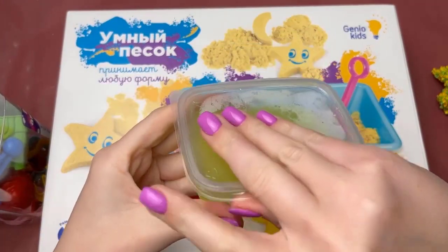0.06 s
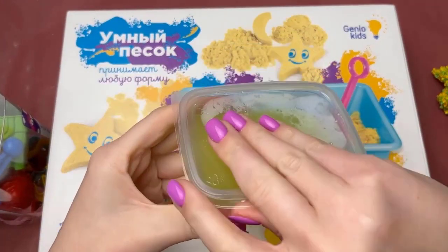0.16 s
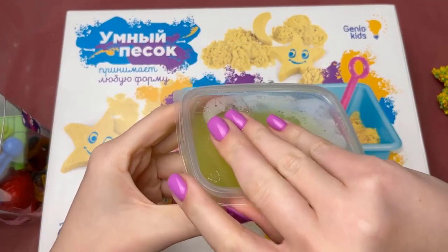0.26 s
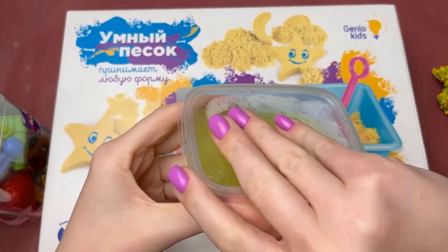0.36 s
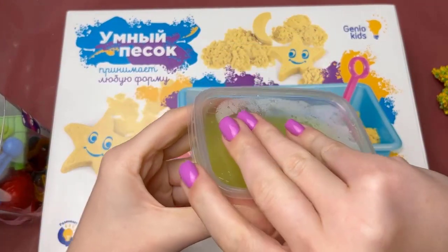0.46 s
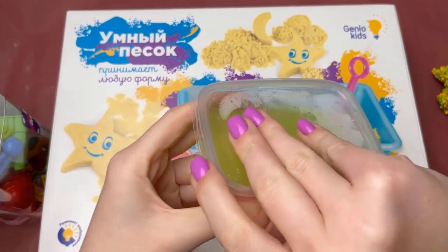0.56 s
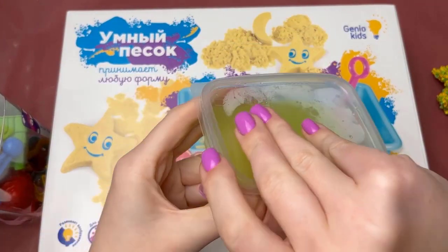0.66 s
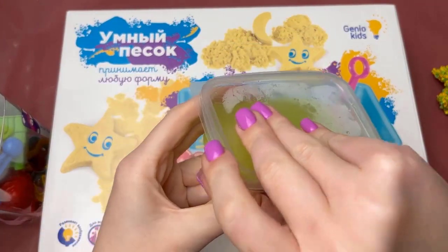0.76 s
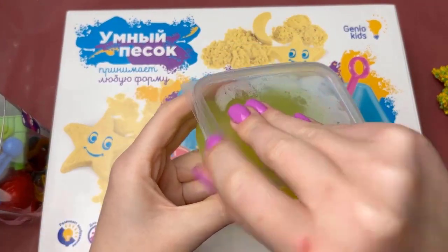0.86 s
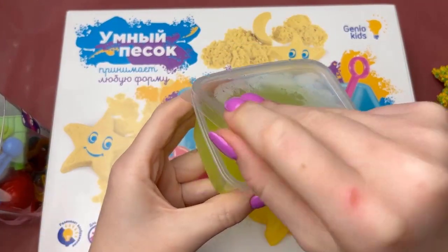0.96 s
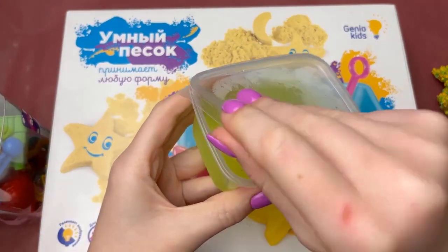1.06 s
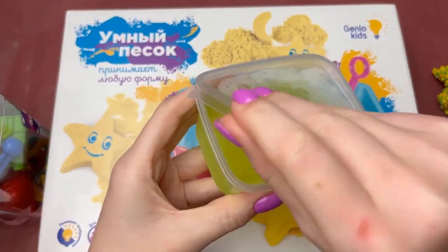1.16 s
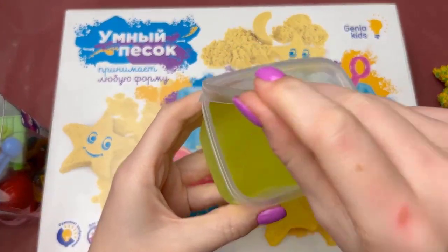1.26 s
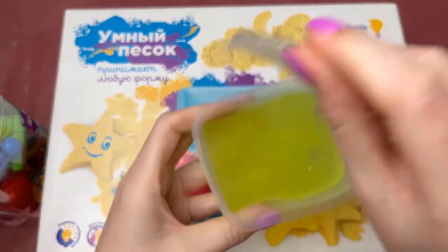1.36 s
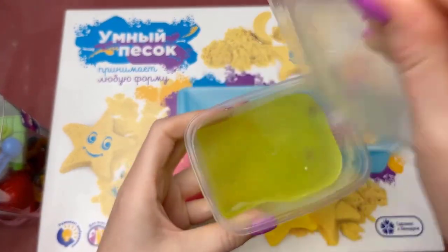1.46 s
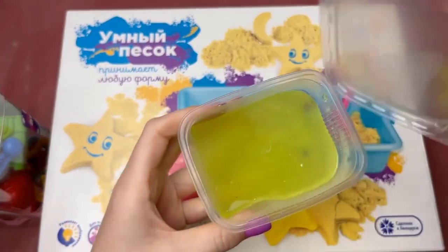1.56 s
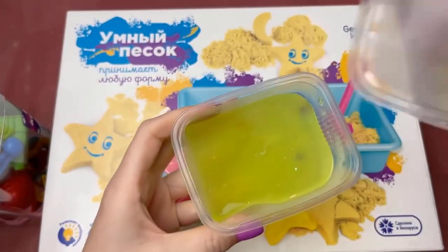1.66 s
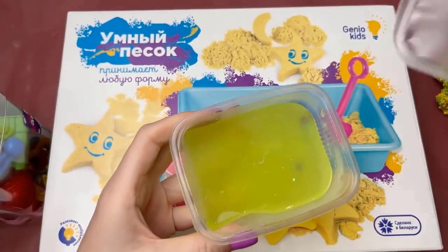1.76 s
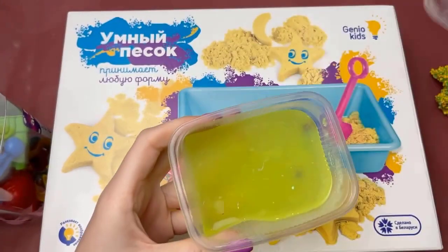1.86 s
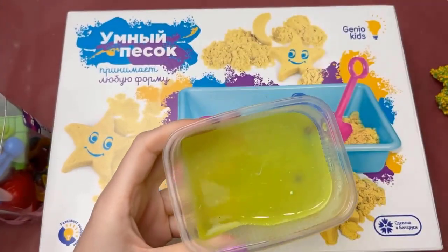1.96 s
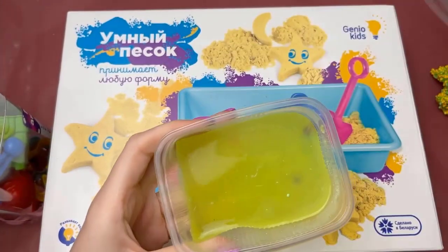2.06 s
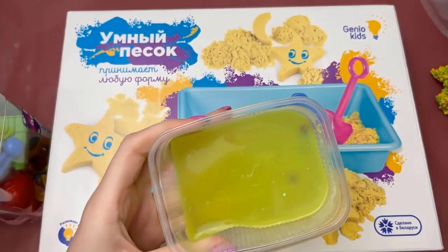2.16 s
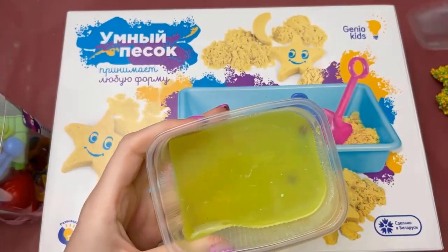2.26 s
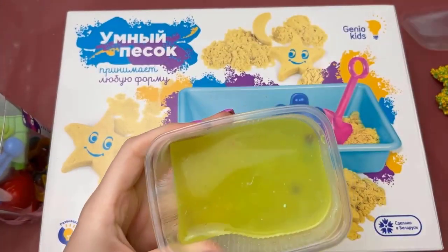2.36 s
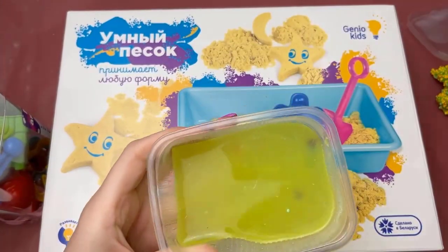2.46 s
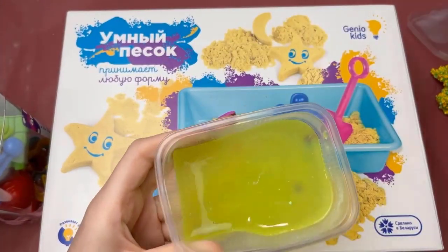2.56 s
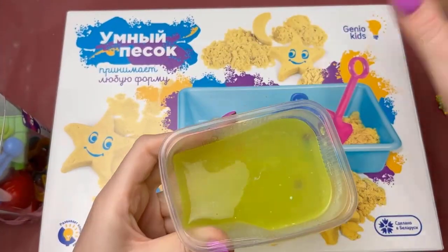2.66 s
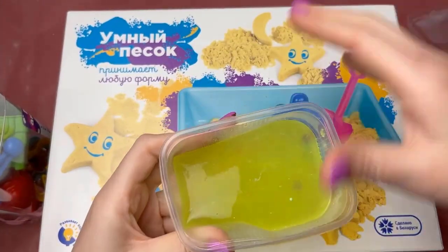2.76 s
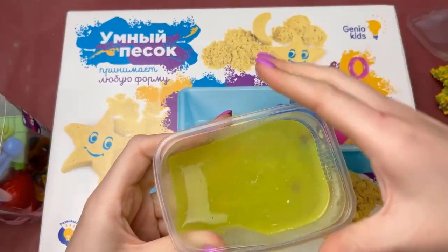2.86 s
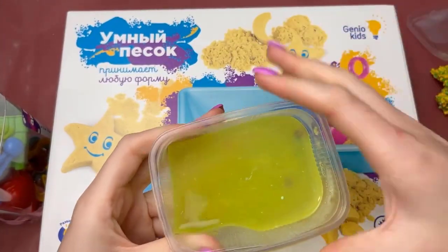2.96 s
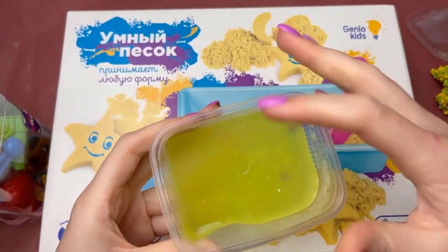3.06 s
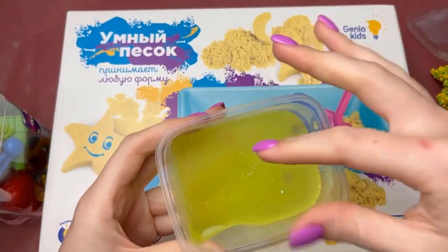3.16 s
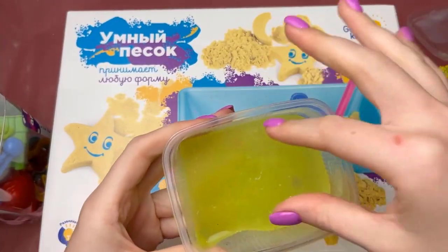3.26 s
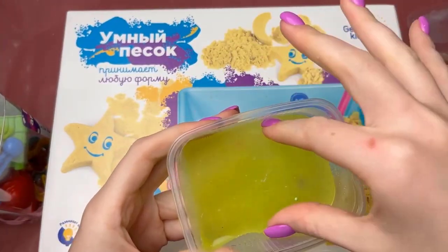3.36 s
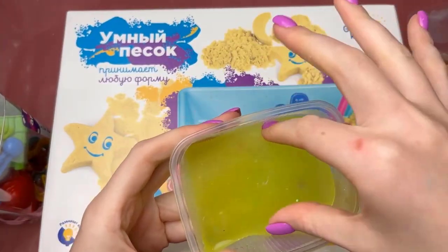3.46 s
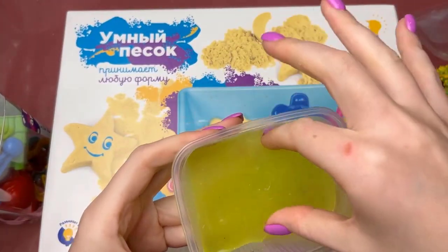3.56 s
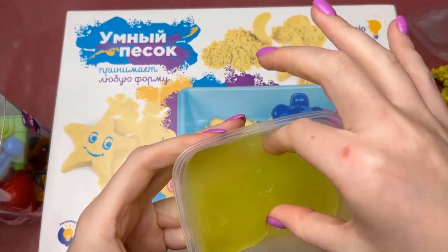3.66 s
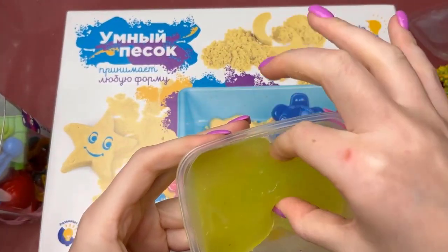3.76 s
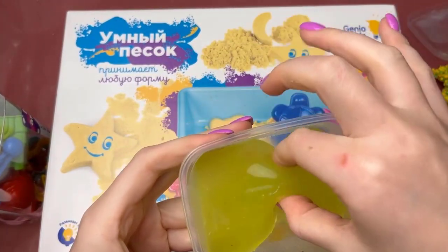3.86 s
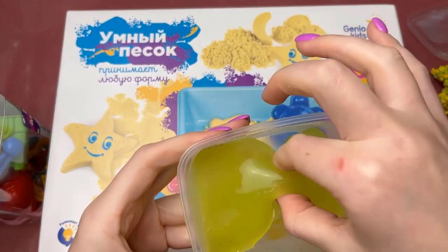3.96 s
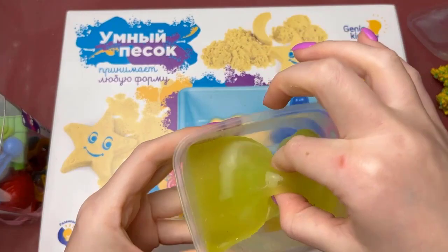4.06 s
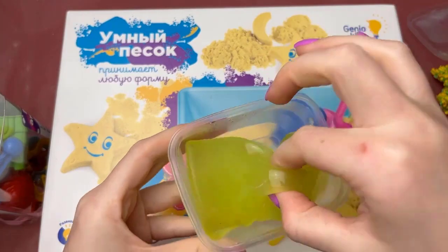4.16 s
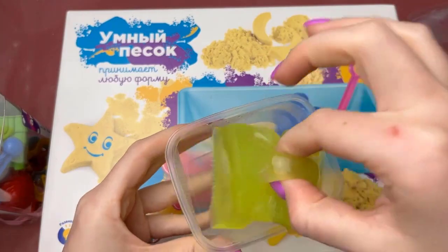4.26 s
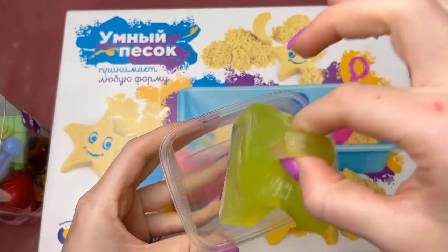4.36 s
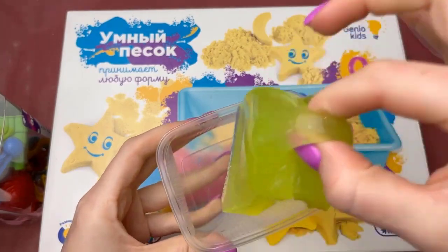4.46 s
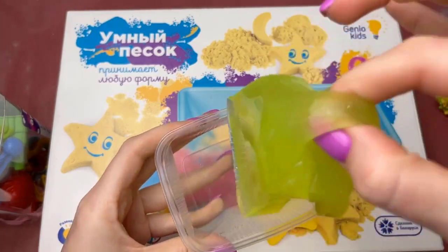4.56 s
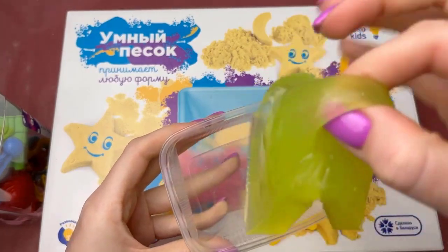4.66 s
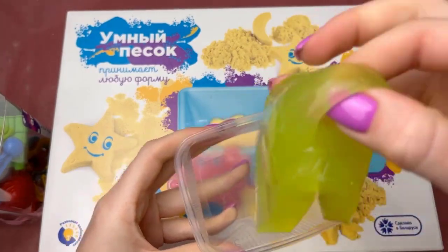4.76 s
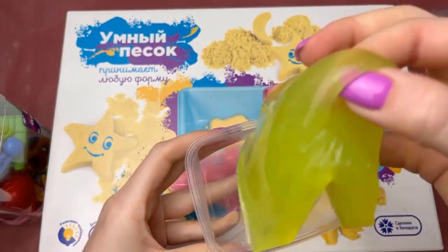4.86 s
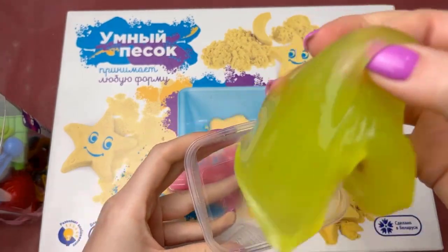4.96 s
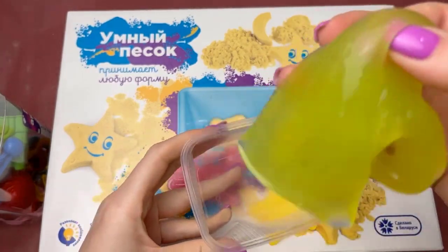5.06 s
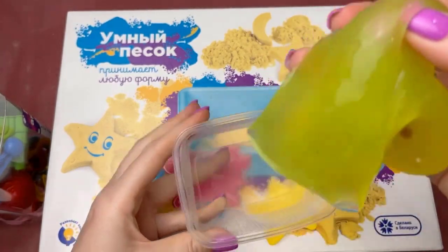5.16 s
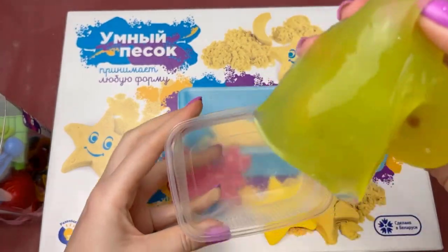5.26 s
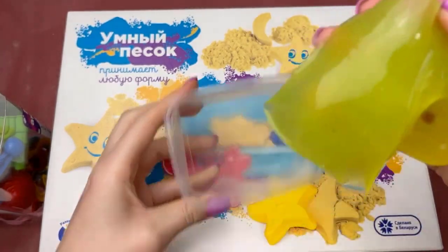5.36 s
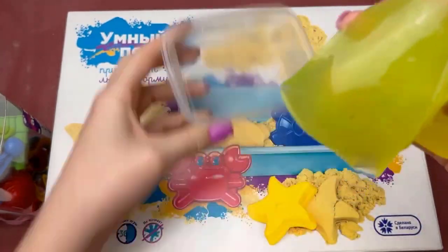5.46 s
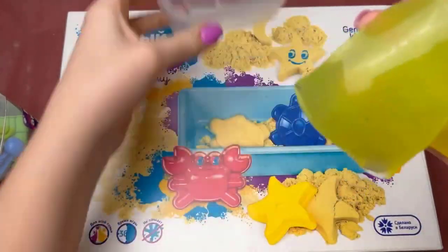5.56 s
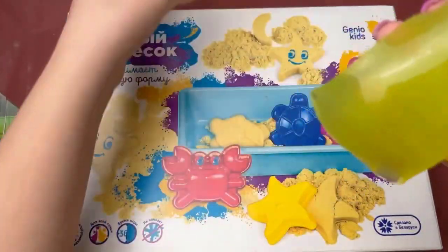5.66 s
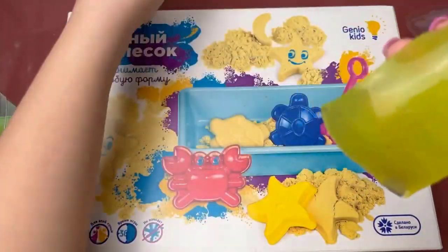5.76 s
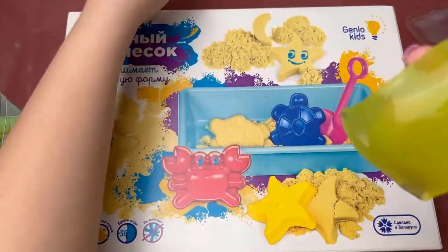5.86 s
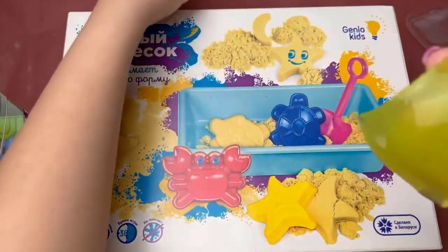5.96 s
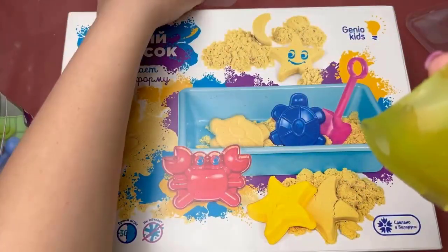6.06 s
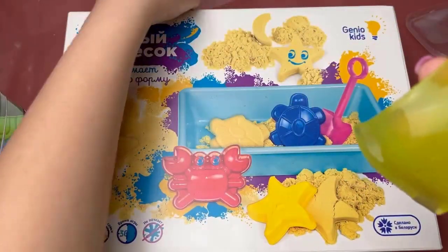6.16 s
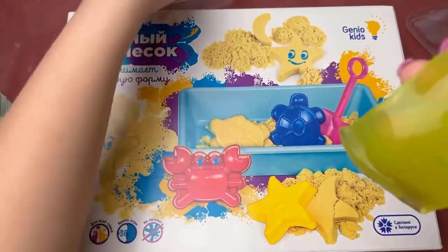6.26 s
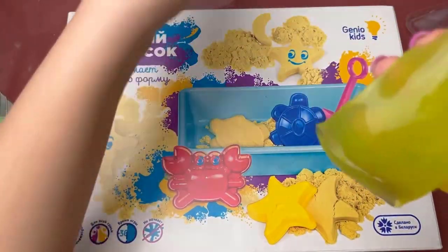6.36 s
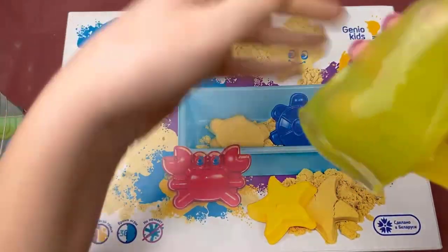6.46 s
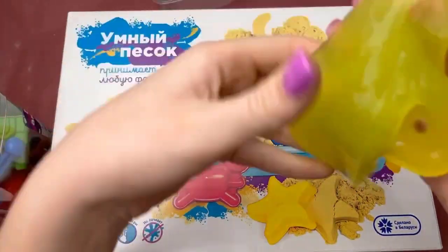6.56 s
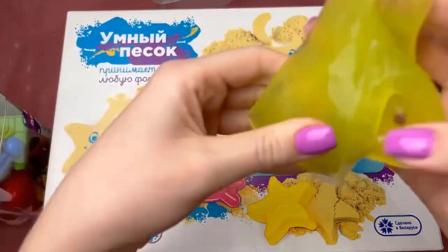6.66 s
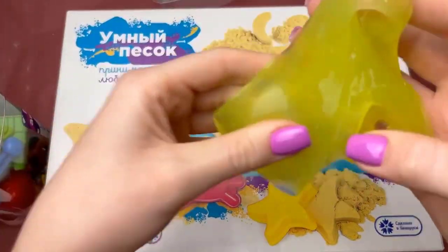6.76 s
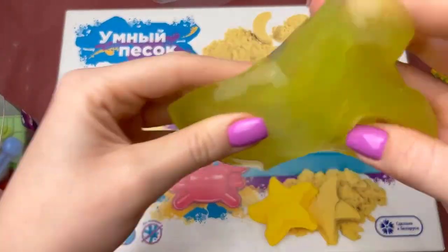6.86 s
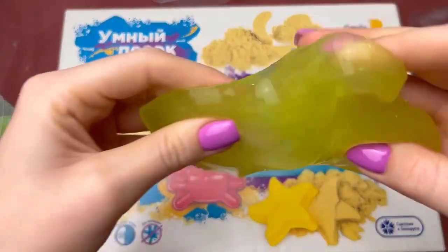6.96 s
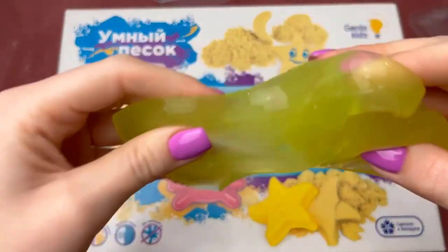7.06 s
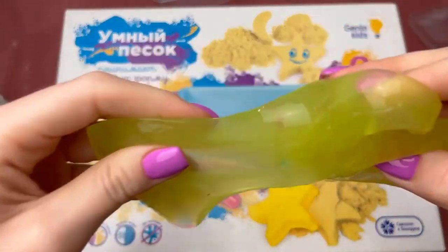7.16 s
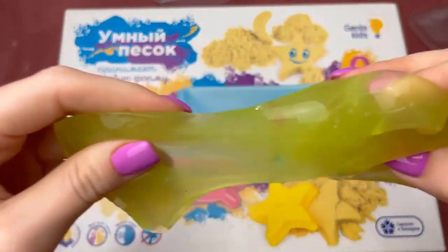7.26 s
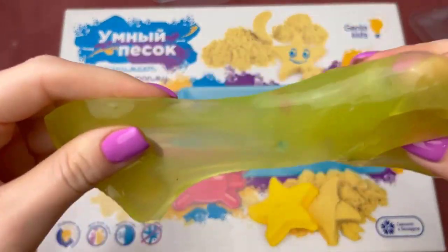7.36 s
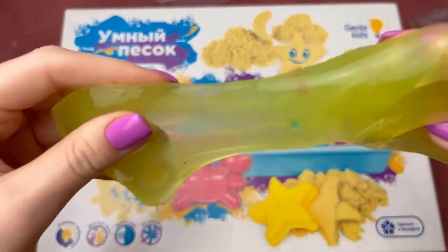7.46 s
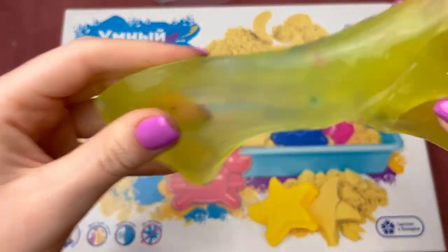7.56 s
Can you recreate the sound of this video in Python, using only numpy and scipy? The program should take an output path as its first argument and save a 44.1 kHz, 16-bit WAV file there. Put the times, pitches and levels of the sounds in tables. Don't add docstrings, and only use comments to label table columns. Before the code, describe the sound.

Close stereo microphone in a small, lightly echoing room with low household rumble. Fingers rub a thin plastic tub and its rim clicks, then snaps hard, building to a very loud, distorted burst as the lid tears free. The lid drops with a small clack. Quiet follows, with skin rubs and tiny ticks, then sticky slime peels with soft wet pops. Finally the empty tub taps and knocks hollowly on the table, rattling briefly.

```python
import sys
import numpy as np
from scipy import signal
from scipy.fft import rfft, irfft
from scipy.io import wavfile

SR = 44100
rng = np.random.default_rng(int(sys.argv[2]) if len(sys.argv) > 2 else 0)


def int16_out(signal):
    q = np.round(np.clip(np.atleast_2d(signal).T, -1, 1) * 32767)
    wavfile.write(sys.argv[1], SR, q.astype(np.int16))


def boost(x):
    u = np.asarray(x, float) / 20
    return 10 ** u


N = 335160

# frequency in hertz, level in dB.
RUMBLE = [(60, -31), (100, -16.5), (125, -15), (225, 0), (270, -10.5), (376, -9.5), (560, -14.5),
          (780, -16.5), (1700, -24.5), (2400, -32.5), (5000, -37.5), (7500, -46), (10000, -49.5),
          (13000, -57.5)]
# time in seconds, level in dB.
SWELL = [(0.0, -48.5), (0.8, -46.5), (1.7, -44), (3.4, -43), (4.25, -43), (7.6, -41.5)]
# frequency in hertz, width in hertz, level in dB.
HUMS = [(100, 15, -74), (206, 5.6, -60.5), (234, 26, -48.5), (366, 44, -53), (506, 21, -53),
        (551.5, 23, -53), (773, 2, -57.5), (3490, 6, -70)]
# start in seconds, hold in seconds, level in dB.
SHAKES = [
    (.99, 0.011, -36.5),
    (1.57, 0.0081, -45),
    (6.27, 0.0097, -35.5),
]
# time in seconds, frequency in hertz, level in dB.
WHINE = [
    (1.82, 580, -68),
    (1.86, 611, -48),
    (1.93, 659, -46),
    (1.98, 655, -55),
    (2.06, 631, -54),
    (2.11, 596, -59),
]
# start in seconds, hold in seconds, level in dB.
HANDLING = [
    (.17, .02, -46.5),
    (.44, 0.75, -51),
    (1.2, 0.041, -41.5),
    (1.5, 0.4, -51),
    (2.41, 0.017, -47),
    (2.96, 0.017, -48),
    (3.49, 0.014, -48),
    (4.2, 1.4, -52.5),
    (6.29, 0.022, -63),
]
# start in seconds, hold in seconds, level in dB.
SLIDES = [(.08, 0.031, -56), (.2, 0.38, -62), (.42, 0.11, -53.5), (.52, 0.092, -46), (1.79, .01, -54.5),
          (2.08, 0.019, -48.5), (2.28, .01, -57.5), (3.0, 0.013, -61.5), (3.42, 0.13, -56),
          (3.56, 0.0062, -47.5), (4.14, 0.14, -60), (5.86, 0.0093, -59.5), (6.53, 0.012, -60),
          (6.86, 0.034, -61.5), (7.32, 0.017, -60)]
# frequency in hertz, level in dB.
SLIDE_COLOUR = [(700, 6.5), (1500, 1.5), (3000, -14), (5000, 3), (8000, -0.5), (11500, -8), (15000, -29)]
# start in seconds, hold in seconds, level in dB.
CRACKLE = [(.095, 0.0027, -38.5), (.925, 0.013, -35), (.96, 0.077, -34.5), (.75, 0.1, -42),
           (1.41, 0.075, -24), (1.48, 0.16, -32), (3.865, 0.0082, -48), (4.1, 0.027, -54),
           (4.15, 0.067, -44.5), (4.275, 0.0055, -37), (4.3, 0.048, -46), (4.615, 0.018, -53),
           (5.218, 0.019, -40), (6.13, 0.089, -37.5), (6.27, 0.02, -29.5), (6.3, 0.017, -32.5),
           (6.36, 0.017, -39), (6.42, 0.12, -49.5)]
# frequency in hertz, level in dB.
CRACKLE_COLOUR = [(300, -7), (800, -1), (1400, 3), (2600, -8.5), (4500, -14.5), (8000, -20.5),
                  (12000, -54.5), (16000, -49.5)]
# start in seconds, hold in seconds, level in dB.
RASPS = [
    (.966, .004, -42),
    (1.405, 0.028, -43),
    (1.412, .003, -35.5),
    (1.426, .016, -38),
    (1.442, 0.035, -30),
    (1.48, .025, -47),
    (1.531, 0.0044, -33.5),
    (4.15, 0.23, -51),
]
# frequency in hertz, level in dB.
RASP_COLOUR = [(1500, -21.5), (3000, -1), (5000, 2.5), (8000, -7.5), (12000, -3.5), (14000, 1),
               (16000, 3.5)]
# time in seconds, peak in dB, wall pitch in hertz, crack in dB, flex in milliseconds.
LID_SNAPS = [(0.101, -26.5, 523, -18, 4.9), (0.289, -36, 550, -44, 7), (0.341, -18, 570, -32.5, 0.37),
             (0.391, -33, 590, -18, 2.2), (0.4336, -10.5, 1016, -75.5, 2.2), (0.4345, -25, 1770, -38, 2.2),
             (0.4364, -10, 553, -70, 3.3), (0.536, -34, 890, -12.5, 3.2), (0.585, -32.5, 985, -14, 2.7),
             (0.746, 7, 647, -22.5, 3.7), (0.7475, -3.5, 1057, -32, 2.7), (0.756, -22, 1050, -26, 7.6),
             (0.933, -16.5, 460, -29, 2.7), (0.938, -14.5, 1440, -23, 5), (0.9712, -3.5, 1790, -22, 2.8),
             (0.9755, -13.5, 1650, -22.5, 7), (0.9908, 1, 1127, -28, 2.34), (0.9938, -5, 610, -41.5, 2.3),
             (1.0025, 1.5, 1313, -28.5, 3.1), (1.182, -17, 1270, -34, 2.2), (1.39, 18.5, 1138, -27.5, 1.38),
             (1.402, -0.5, 854, -17.5, 4.2), (1.412, -11.5, 1210, -25, 1.1), (1.421, 6.5, 1340, -18, 4),
             (1.4245, 1, 1400, -25, 2.1), (1.456, 10, 1350, -23.5, 2.9), (1.4595, 9, 1320, -20, 3.4),
             (1.463, -1.5, 1380, -20, 3), (1.468, -6, 1320, -18.5, 3), (1.472, -10.5, 1400, -15, 2.8),
             (1.527, 2, 1136, -13.5, 3), (1.5335, -12.5, 569, -4, 7.3)]
# frequency in hertz, level in dB.
CRACK_COLOUR = [(1500, 3.5), (3000, 2), (5000, -2), (8000, -3.5), (11500, -11), (16000, -25.5)]
# frequency in hertz, level in dB, t60 in seconds.
TUB = [(526.3, -14.5, 0.05), (743.4, -0.5, 0.039), (994, -11.5, 0.016), (1162, 0.5, 0.018),
       (1400, -9.5, 0.16), (1800, -19.5, 0.052), (2400, -17.5, 0.038), (2796, -14.5, 0.091)]
# time in seconds, peak in dB, frequency in hertz, t60 in seconds.
THUDS = [(.102, -27, 250, 0.061), (0.746, -7, 267, 0.034), (0.994, -10.5, 330, 0.047),
         (1.238, -30.5, 60, 0.17), (1.395, -15, 124, 0.067), (1.535, -6.5, 133, 0.057),
         (1.931, -32, 100, 0.11), (2.392, -22.5, 234, 0.027), (3.393, -29.5, 391, 0.022),
         (4.102, -29.5, 232, 0.029), (4.297, -32, 232, 0.049), (5.209, -18, 394, 0.014),
         (5.241, -26, 232, 0.039), (6.142, -18.5, 356, 0.17), (6.246, -10.5, 367, 0.11),
         (6.325, -18.5, 87, 0.06), (7.33, -28.5, 43.1, 0.19)]
# time in seconds, peak in dB.
TICKS = [(0.2142, -46), (0.305, -51.5), (1.798, -44), (2.0744, -59), (2.172, -46.5), (2.26, -50.5),
         (2.314, -59), (3.697, -49.5), (4.089, -50.5), (4.164, -47), (5.191, -43), (6.844, -59),
         (7.292, -48), (7.319, -47)]
# time in seconds, peak in dB.
PEEL = [(4.18, -48), (4.188, -50), (4.211, -49), (4.2377, -50), (4.248, -57), (4.284, -45), (4.307, -49),
        (4.327, -47), (4.3343, -48)]
# time in seconds, level in dB.
PANEL_BLOWS = [
    (0.746, -22),
    (1.003, -30),
    (1.53, -27),
    (6.138, -23),
    (6.247, -26),
]
# frequency in hertz, level in dB, t60 in seconds.
PRESSED = [(610, -10, .3), (680, -12, 0.28), (960, -7, 0.32), (1056, -3, 0.088), (1400, -18, .2),
           (2260, -16, .25)]
# frequency in hertz, level in dB, t60 in seconds.
BENT = [(497, -5, 0.26), (1250, -4, 0.41), (1319, -5, 0.48), (1900, -13, 0.4), (2280, 0, 0.16),
        (3740, -9, 0.091)]
# frequency in hertz, level in dB, t60 in seconds.
FREED = [(1050, -3, 0.32), (1300, -6, 0.33), (1520, 0.5, .4), (2700, -1.5, 0.6), (3120, -2, 0.27),
         (4000, -16, .3)]
# frequency in hertz, level in dB, t60 in seconds.
LANDED = [(202, -10, 0.14), (339.5, -0.5, .12), (541, -5.5, 0.11), (690, -6, .08), (903, -5, .08),
          (1120, -17, 0.055)]
# time in seconds, peak in dB, pitch in hertz.
SLIPS = [(1.3965, -11.5, 1300), (1.4285, -18.5, 1000), (1.434, -14.5, 1400), (1.4427, -12, 1500),
         (1.448, -15, 1300), (1.4525, -9, 1440), (1.478, -11.5, 1400), (1.4865, -13, 1400),
         (1.4905, -15.5, 1333), (1.496, -12.5, 1437), (1.506, -17, 1400), (1.5205, -16.5, 1400),
         (1.528, -7.5, 2900), (1.5325, -11, 8600)]
# time in seconds, peak in dB, pitch in hertz, crack in dB,
# flex in milliseconds.
KNOCKS = [
    (1.905, -52, 646, -40.5, 4),
    (1.927, -32, 641.6, -4, 6.8),
    (6.1365, -10.5, 875, -11.5, 6.5),
    (6.139, -14, 330, -34, 2.7),
    (6.243, -21, 1500, 0, 2.2),
    (6.2455, -11.5, 390, -11, 2.4),
    (6.255, -9, 346, -20.5, 1.6),
    (6.29, -22, 292, -52.5, 11),
    (6.476, -36, 390, -8, 3.8),
    (6.1405, -16, 714, -40, 4.1),
]
# frequency in hertz, level in dB.
KNOCK_COLOUR = [(300, 1.5), (1500, -1), (3000, -0.5), (5000, 1), (8000, -2), (12000, -6)]
# time in seconds, peak in dB, pitch in hertz, crack in dB,
# flex in milliseconds.
LID_DROP = [
    (2.391, -19.5, 1235, -8.5, 1),
]
# time in seconds, peak in dB, pocket pitch in hertz, crack in dB,
# flex in milliseconds.
SLIME_POPS = [(2.679, -42, 1654, -30.5, 3.3), (3.393, -19.5, 1400, -40, 0.95),
              (3.461, -23.5, 1596, -16.5, 2), (3.658, -36, 1630, -11.5, 4.4),
              (3.8701, -34.5, 1455, -13, 2.8), (3.876, -23.5, 900, -17.5, 0.76),
              (4.1, -37.5, 1480, -10, 1.5), (4.137, -12, 1090, -27, 0.88), (4.198, -33, 1180, -13, 1.1),
              (4.227, -41, 1110, -16, 1.5), (4.3173, -35, 1460, -10, 1.2), (4.263, -34.5, 1300, -10, 4.6),
              (4.275, -31, 1580, -18, 3), (4.295, -47, 1850, -1, 1.6), (4.3417, -41.5, 1500, 2, 3.5),
              (4.346, -41, 1400, -3, 3.8), (4.612, -43.5, 1450, -15, 2.37),
              (5.2048, -15.5, 1698, -20, 1.17), (5.2065, -28.5, 783, -33, 2.1), (5.225, -36, 914, -7, 1.4),
              (5.242, -37, 867, -28, 0.94), (5.4683, -25.5, 1870, -9, 2.3), (5.472, -34.5, 1360, -20, 3.2),
              (4.621, -40, 1510, -14, 1.7), (3.98, -45.5, 3200, -31.5, 1.8),
              (4.1375, -21.5, 3430, -23, 1.4), (4.349, -38.5, 1400, -5, 2.5),
              (4.2595, -34, 1600, -3.5, 1.9), (4.357, -51, 1300, -6, 2.5)]
# time in seconds, peak in dB, pitch in hertz, crack in dB,
# flex in milliseconds.
SOFT_TAPS = [
    (6.0645, -22.5, 960, -61, 5.4),
    (6.069, -28, 855, -63.5, 3.5),
    (6.075, -29, 906, -60, 4),
]
# delay in milliseconds, level in dB.
DESK = [(1.0, -9), (1.7, -9)]
# frequency in hertz, t60 in seconds.
ROOM = [(150, 0.81), (400, 0.39), (1040, 0.42), (2760, 0.57), (7280, 0.5)]
# frequency in hertz, level in dB.
ROOM_COLOUR = [(100, 18), (300, 21), (700, 20), (1500, 19), (3000, 20), (6000, 13.5), (11000, 7.5),
               (16000, -13)]
LIKENESS = [(60, .95), (130, .94), (290, .8), (640, .3), (1400, .4), (2600, .25), (4000, .45), (5600, .8),
            (12000, .7)]
PORT_HALF_TURNS = [(0, 0), (1800, 0), (2600, .66), (3100, .62), (4000, .27), (4600, .45), (5250, .5),
                   (5950, 1), (6600, 1), (7200, 2), (8750, 2), (9700, 3), (10900, 3), (11300, 3.7)]


def rms_one(x):
    return x / np.sqrt(np.mean(x ** 2) + 1e-20)


def in_time(rows, outside=None):
    s, *columns = np.transpose(rows)
    return [np.interp(np.arange(N) / SR, s, c, outside, outside) for c in columns]


def at_hz(points, hz):
    table_hz, values = np.transpose(points)
    return np.interp(np.log(hz + 1), np.log(table_hz), values)


def coloured(x, spectrum):
    size = x.shape[-1]
    hz = np.arange(size // 2 + 1) * SR / size
    return irfft(rfft(x) * boost(at_hz(spectrum, hz)), size)


def diffuse(size):
    mid, side = rfft(rng.standard_normal((2, size)))
    alike = np.clip(at_hz(LIKENESS, np.arange(len(mid)) * SR / size), 0, 1)
    return irfft(np.sqrt(1 + alike) * mid + np.sqrt(1 - alike) * side * [[1], [-1]], size)


def ring(clicks, hz, t60):
    radius, angle = boost(-60 / (t60 * SR)), 2 * np.pi * hz / SR
    feedback = [1, -2 * radius * np.cos(angle), radius * radius]
    return signal.lfilter([0, np.sin(angle)], feedback, clicks + 1e-18)


def strokes(rows, rise, fall):
    t = np.arange(0, N, 32) / SR
    start, hold, db = np.transpose(rows)[:, :, None]
    before, after = np.maximum(start - t, 0), np.maximum(t - start - np.abs(hold), 0)
    level = db - rise * before - fall * after
    return np.interp(np.arange(N) / SR, t, np.sqrt(np.sum(boost(2 * level), axis=0)))


def waver(x):
    out, seconds = x.copy(), np.arange(N) / SR
    lulls = -np.interp(seconds * 2.5, np.arange(40), rng.standard_normal(40))
    for low in 1500 * 2 ** np.arange(0, 2.6, 1 / 3):
        flicker = np.interp(seconds * 9, np.arange(200), rng.standard_normal(200))
        gain = boost(2.5 * flicker + lulls)
        third = signal.butter(2, [low, low * np.cbrt(2)], "band", fs=SR, output="sos")
        out += (gain - 1) * signal.sosfiltfilt(third, x)
    return out


def household():
    rumble = waver(rms_one(coloured(diffuse(N), RUMBLE)))
    white = diffuse(N)
    for hz, width_hz, db in HUMS:
        rumble += boost(db + 42.5) * rms_one(ring(white, hz, 2.1 / width_hz))
    level = np.hypot(boost(in_time(SWELL)[0] - 2.0), strokes(SHAKES, rise=114, fall=68.5))
    whine_hz, whine_db = in_time(WHINE)[0], in_time(WHINE, -200)[1]
    whine = boost(whine_db) * np.sqrt(2) * np.sin(2 * np.pi * np.cumsum(whine_hz) / SR)
    return level * rumble + whine


def handling():
    bass = signal.butter(3, [40, 130], "band", fs=SR, output="sos")
    draught = rms_one(signal.sosfilt(bass, diffuse(N)))
    calm_db = -53.5
    return np.hypot(boost(calm_db), strokes(HANDLING, rise=57.5, fall=57.5)) * draught


def rubs():
    sizes = boost(3.5 * np.minimum(rng.exponential(1, N), 4)) * rng.choice([-1, 1], N)
    slips = sizes * (rng.random(N) < 2500 / SR)
    hiss = rms_one(coloured(rng.standard_normal(N), SLIDE_COLOUR))
    rasp = rms_one(coloured(slips, RASP_COLOUR))
    creak = rms_one(coloured(slips, CRACKLE_COLOUR))
    return (strokes(SLIDES, rise=326.5, fall=213) * hiss
            + strokes(CRACKLE, rise=898, fall=448) * creak
            + strokes(RASPS, rise=898, fall=898) * rasp)


def snaps(events, overtone, overtone_db, glide, clatter_db, clatter_ms, crack_ms, thump_hz, thump_db):
    size, lead = 2048, .008
    out, t = np.zeros((2, N + size)), np.arange(size) / SR - lead
    white = rng.standard_normal((len(events), 2, size))
    white[:, :, 358] = 2.0
    cracks, clatters = coloured(white[:, 0], CRACK_COLOUR), coloured(white[:, 1], CRACKLE_COLOUR)
    click = 1. * (np.arange(size) == 400)
    crack_step, clatter_step = [rms_one(coloured(click, c)) / 45 for c in (CRACK_COLOUR, CRACKLE_COLOUR)]
    after = np.maximum(t, 0)
    creep = boost(-24.0) * np.exp(np.minimum(t, 0) / 0.0066) * (t < 0)
    crack_shape = (t >= 0) * np.exp(-after / (crack_ms / 1000)) + creep
    clatter_shape = (t >= 0) * np.exp(-after / (clatter_ms / 1000)) + creep
    crack_step = crack_step * np.linalg.norm(crack_shape)
    clatter_step = clatter_step * np.linalg.norm(clatter_shape)
    for (s, db, hz, crack_db, flex_ms), crack, clatter in zip(events, cracks, clatters):
        swing = np.minimum(after / 0.0011, 1) * np.exp(-(after / (max(flex_ms, .5) / 1000)) ** 2.8)
        turns = hz * (0.9104 * after + glide * 0.0028 * (1 - np.exp(-after / 0.002)))
        flex = np.sin(2 * np.pi * turns) + boost(overtone_db) * np.sin(2 * np.pi * overtone * turns)
        push_level = boost(thump_db - 0.24 * db)
        push = push_level * np.sin(2 * np.pi * thump_hz * after) * np.exp(-after / 0.0084)
        high, mid = boost(crack_db + 7.5), boost(clatter_db + 0.16 * (crack_db + 19.5))
        near = high * rms_one(crack) * crack_shape + mid * rms_one(clatter) * clatter_shape
        far = high * crack_step + mid * clatter_step
        i = round((s - lead) * SR)
        out[:, i:i + size] += boost(db) * (swing * flex * boost([[0], [-3]]) + push + np.array([near, far]))
    return signal.sosfilt(signal.butter(2, 150, "high", fs=SR, output="sos"), out[:, :N])


def lid_rim():
    return snaps(LID_SNAPS, overtone=1.9, overtone_db=-10.0, glide=0.24, clatter_db=-16.5, clatter_ms=0.57,
                 crack_ms=3.3, thump_hz=200.0, thump_db=-27.0)


def tub(events):
    at, out = [round(e[0] * SR) for e in events], np.zeros(N)
    spread_db = 3 * rng.standard_normal((len(at), len(TUB)))
    for k, (hz, level_db, t60) in enumerate(TUB):
        clicks = np.zeros(N)
        clicks[at] = boost(np.array(events)[:, 1] + level_db - 20.0 + spread_db[:, k])
        out += ring(clicks, hz, np.clip(t60, .02, .15))
    return out


def thuds():
    out = np.zeros(N)
    for s, db, hz, t60 in THUDS:
        out += boost(db) * ring(np.arange(N) == round(s * SR), hz, t60)
    return signal.sosfilt(signal.butter(2, 500, fs=SR, output="sos"), out)


def ticks():
    hz, crack_db, flex_ms = 1600, -3.5, 0.47
    events = [(s, db, hz, crack_db, flex_ms) for s, db in TICKS + PEEL]
    return snaps(events, overtone=.7, overtone_db=-6, glide=.2, clatter_db=-26, clatter_ms=1.5,
                 crack_ms=2.5, thump_hz=250, thump_db=-50)


def panel():
    out = np.zeros(N)
    for (s, db), modes in zip(PANEL_BLOWS, (PRESSED, BENT, FREED, LANDED, LANDED)):
        click = np.arange(N) == round(s * SR)
        for hz, level_db, t60 in modes:
            for split in (.985, 1.015):
                out += boost(db + level_db) * ring(click, split * hz, np.clip(t60, .05, .4))
    return out


def seal_slips():
    crack_db, flex_ms = -31.5, 1.6
    events = [(s, db, hz, crack_db, flex_ms) for s, db, hz in SLIPS]
    return snaps(events, overtone=1.7, overtone_db=-13.5, glide=0.11, clatter_db=-16, clatter_ms=2.2,
                 crack_ms=1.5, thump_hz=200, thump_db=-40)


def dulled(x):
    return signal.sosfilt(signal.cheby2(8, 30, 13000, fs=SR, output="sos"), x)


def landings():
    knocks = snaps(KNOCKS, overtone=7.8, overtone_db=-26.0, glide=0.26, clatter_db=-7.5, clatter_ms=3.7,
                   crack_ms=2.8, thump_hz=330, thump_db=-12.5)
    return coloured(dulled(knocks), KNOCK_COLOUR)


def lid_drop():
    return dulled(snaps(LID_DROP, overtone=1.66, overtone_db=9.0, glide=0.47, clatter_db=-22.0,
                        clatter_ms=4.9, crack_ms=8.0, thump_hz=243, thump_db=-37.5))


def slime_pops():
    return snaps(SLIME_POPS, overtone=0.95, overtone_db=3.5, glide=0.038, clatter_db=-5.5, clatter_ms=1.3,
                 crack_ms=2.1, thump_hz=232, thump_db=-27)


def soft_taps():
    return snaps(SOFT_TAPS, overtone=1.72, overtone_db=-11, glide=.1, clatter_db=-41, clatter_ms=2.3,
                 crack_ms=1.5, thump_hz=200, thump_db=-49.5)


def desk(x):
    return np.array([side + boost(db) * np.roll(side, round(ms * SR / 1000)) for side, (ms, db) in zip(x, DESK)])


def room(x):
    t, white, echo = np.arange(SR) / SR, diffuse(SR), 0
    for low in 88 * 2 ** np.arange(8):
        octave = signal.butter(2, [low, min(2 * low, .45 * SR)], "band", fs=SR, output="sos")
        level_db = at_hz(ROOM_COLOUR, 0.79 * low) - 60 * t / at_hz(ROOM, 1.69 * low)
        echo = echo + boost(level_db) * signal.sosfilt(octave, white)
    echo = echo * np.clip((t - .003) / 0.00034, 0, 1)
    return signal.fftconvolve(x[None], echo / np.sqrt(np.sum(echo ** 2)), axes=1)[:, :N]


def scene():
    background = household() + handling()
    rub = rubs()
    lid = lid_rim() + tub(LID_SNAPS) + panel() + seal_slips() + soft_taps()
    pops = slime_pops() + ticks()
    knocks, drop = landings(), lid_drop()
    direct = (lid[0] + knocks[0]) * boost([[-.4], [.4]]) + pops[0] + drop[0] + rub
    near = desk(direct) + thuds()
    wet = boost(-8.0) * lid[1] + boost(-6.0) * pops[1] + boost(-5.5) * knocks[1]
    wet += boost(2.0) * drop[1] + boost(-11.0) * rub
    return near + room(wet) + background


def roll_off(x):
    return signal.sosfilt(signal.butter(12, 15560, fs=SR, output="sos"), x)


def record(dry):
    dry = signal.sosfilt(signal.cheby2(8, 30, 16300, fs=SR, output="sos"), dry)
    dry = signal.sosfilt(signal.butter(2, 36, "high", fs=SR, output="sos"), dry)
    hz = np.arange(N // 2 + 1) * SR / N
    turn = np.interp(hz, *np.transpose(PORT_HALF_TURNS)) * np.pi / 2
    ports = irfft(rfft(dry) * np.exp(1j * turn * [[1], [-1]]), N)
    rounded = ports / (1 + np.abs(ports / .99) ** 4) ** .25
    return roll_off(rounded)


dry = scene()
out = record(dry)
int16_out(out)
```